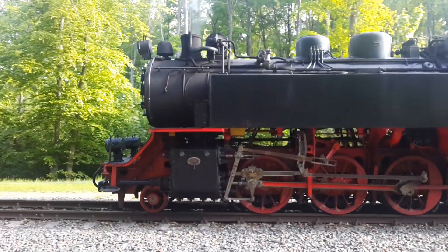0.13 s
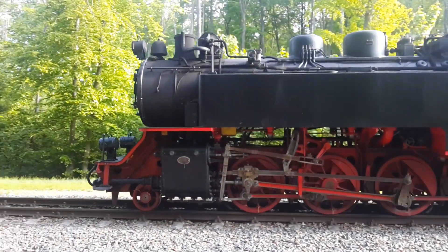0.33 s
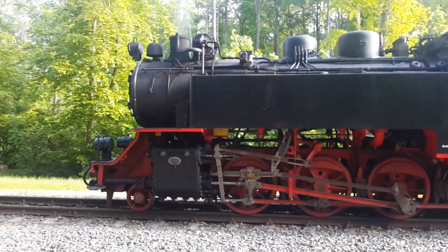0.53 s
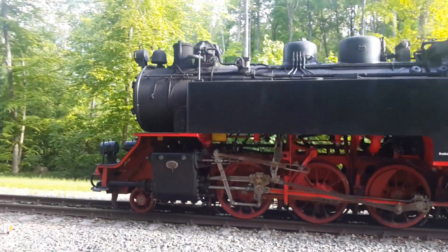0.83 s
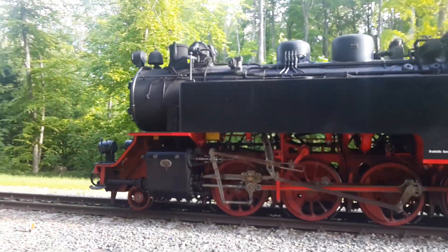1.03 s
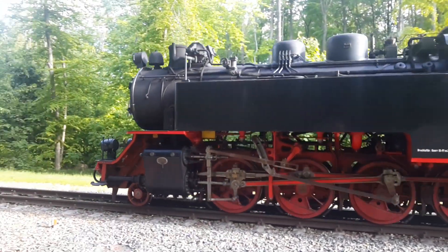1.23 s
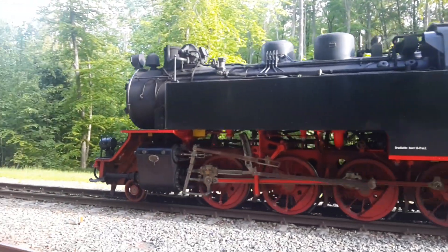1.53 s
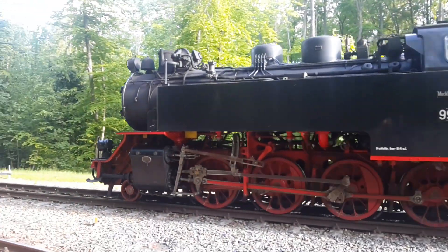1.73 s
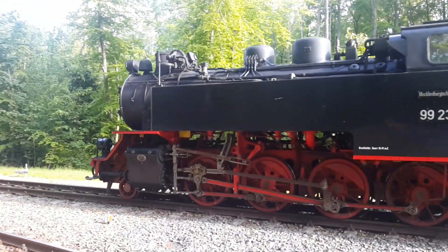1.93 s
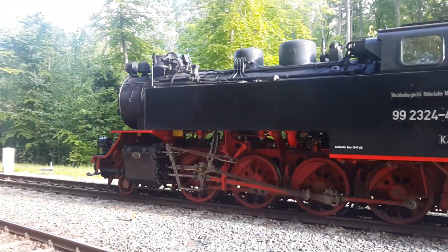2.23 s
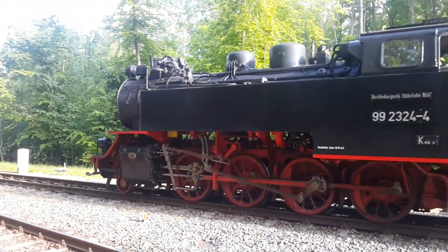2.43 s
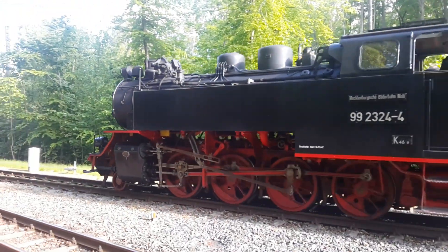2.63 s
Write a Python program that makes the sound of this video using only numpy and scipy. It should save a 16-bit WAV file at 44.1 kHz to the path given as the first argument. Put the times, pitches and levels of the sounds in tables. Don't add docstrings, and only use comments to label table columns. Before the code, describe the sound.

Steady throaty exhaust beats from a passing steam engine, each a lumpy low hoot with roar and hiss, a few rod knocks between, and a brief valve puff last; outdoors, close, uneven stereo microphone.

```python
import sys
import numpy as np
from scipy import signal
from scipy.io import wavfile

SR = 44100
rng = np.random.default_rng(int(sys.argv[2]) if len(sys.argv) > 2 else 0)


def invert_db(level):
    return 10 ** (np.asarray(level, dtype=float) / 20)


def to_wav(s):
    ch = np.atleast_2d(s).T
    pcm = np.round(np.clip(ch, -1, 1) * 32767)
    wavfile.write(sys.argv[1], SR, pcm.astype(np.int16))


N = 123479
TIME_S = np.arange(N) / SR
MIRROR = np.array([[1], [-1]])


def rms_one(x):
    return x / np.sqrt(np.mean(x ** 2) + 1e-20)


def at_hz(points, hz):
    table_hz, value = np.array(points).T
    return np.interp(np.log(hz), np.log(table_hz), value)


def drift(rate):
    r = np.exp(-80 * np.pi * rate / SR)
    slow = signal.lfilter([1], [1, -2 * r, r * r], rng.standard_normal(N // 40 + 2002))
    slow = slow[2000:]
    return np.interp(np.arange(N) / 40, np.arange(len(slow)), rms_one(slow))


def spin(pitch_hz):
    return np.exp(2j * np.pi * np.cumsum(pitch_hz) / SR)


def resonance(x, hz, width_hz):
    r = np.exp(-np.pi * width_hz / SR)
    top = np.array([1, 0, -1]) * (1 - r * r) / 2
    return signal.lfilter(top, [1, -2 * r * np.cos(2 * np.pi * hz / SR), r * r], x)


# frequency in Hz, likeness from 0 to 1.
PORT_LIKENESS = [(60, 0.82), (250, 1), (600, 0.98), (1200, 0.96), (2400, 0.14), (4500, .3), (9000, 0)]


def pair(hz, white):
    alike = np.clip(at_hz(PORT_LIKENESS, hz), 0, 1)
    middle, side = np.sqrt(1 + alike) * white[0], np.sqrt(1 - alike) * white[1]
    return (middle + side * MIRROR) / np.sqrt(2)


def banded(spectrum, patchy_db):
    edges = 28 * 2 ** np.arange(0, 9.6, .5)
    centres = np.sqrt(edges[1:] * edges[:-1])
    white = rng.standard_normal((2, 2, N))
    together = drift(1.3)
    bands = []
    for k, hz in enumerate(centres):
        band_pass = signal.butter(2, [edges[k], edges[k + 1]], "band", fs=SR, output="sos")
        band = signal.sosfilt(band_pass, white[k % 2])
        flicker_db = patchy_db * (0.58 * together + drift(18))
        bands.append(invert_db(at_hz(spectrum, hz) + flicker_db) * pair(hz, band))
    return centres, np.array(bands) / np.sqrt(np.mean(sum(bands) ** 2))


def swell(start, attack, hold, release):
    t = TIME_S - start
    rise = np.sin(np.pi / 2 * np.clip(t / attack, 0, 1)) ** 2
    return rise * np.exp(-np.maximum(t - attack - hold, 0) / release)


# start in seconds, length in seconds, echo level in dB, roar level in dB,
# brightness in dB per octave.
EXHAUST_BEATS = [
    (0.175, 0.074, -12, -25, -0.86),
    (0.593, 0.075, -20.5, -24, .3),
    (0.988, 0.087, -22, -23.5, -0.85),
    (1.358, 0.081, -24, -27, 0.2),
    (1.737, 0.068, -20, -25, -0.1),
    (2.109, 0.098, -22, -28, -1.4),
    (2.469, 0.096, -20, -27, -1.5),
]


def beats(levels_db, wood_db):
    attack_s, hold_share, release_s, wood_t60_s = .042, 0.29, .022, 0.84
    total = 0
    for (start, length, *_), db in zip(EXHAUST_BEATS, levels_db):
        direct = swell(start - attack_s / 2, attack_s, hold_share * length, release_s)
        echo = invert_db(wood_db) * swell(start, length, 0, wood_t60_s / np.log(1000))
        total = total + invert_db(db) * (direct + echo)
    return total


# start in seconds, peak level in dB, length in seconds.
STEAM_LUMPS = [(0.183, -34, 0.013), (0.21, -6, 0.044), (0.236, -23, 0.03), (0.592, -27, 0.022),
               (0.612, -3, 0.027), (0.67, -12.5, 0.016), (0.973, -16.5, 0.063), (0.989, -8.5, 0.04),
               (1.027, -10, 0.014), (1.044, -10, 0.03), (1.096, -18, 0.01), (1.373, -24, 0.013),
               (1.381, -4.5, 0.02), (1.428, -20.5, 0.03), (1.746, -11, 0.039), (1.77, -7.5, 0.014),
               (1.81, -14.5, 0.011), (1.83, -31, 0.03), (2.102, -13.5, 0.011), (2.127, -5, 0.034),
               (2.162, -18.5, 0.044), (2.187, -15.5, 0.016), (2.469, -10.5, 0.023), (2.495, -12.5, 0.017),
               (2.507, -12, 0.033), (2.532, -21, 0.021)]
# time in seconds, pitch in Hz.
CHIMNEY_PITCH = [
    (.23, 256.1),
    (.64, 258.6),
    (1.041, 256),
    (1.411, 231.4),
    (1.79, 245),
    (2.152, 266),
    (2.52, 263.5),
]


def chimney_note():
    wander_hz, wander_rate, flutter_db, note_db = 20, 13.89, 3, -6.5
    side_width_hz, side_share, ring_width_hz, ring_even = 37, .05, 11.7, .8
    rise_s, fall_s, wood_db = 0.011, .012, -10
    pitch = np.interp(TIME_S, *np.transpose(CHIMNEY_PITCH))
    note = spin(pitch + wander_hz * drift(wander_rate)).imag * invert_db(flutter_db * drift(17.5))
    side = drift(side_width_hz) + 1j * drift(side_width_hz)
    side = rms_one((side * spin(pitch)).real)
    ring = drift(ring_width_hz) + 1j * drift(ring_width_hz)
    ring = ring / (np.abs(ring) + 0.043) ** ring_even
    ring = rms_one((ring * spin(pitch)).real)
    power = 0
    for start, db, length in STEAM_LUMPS:
        power = power + (invert_db(db) * swell(start, rise_s, max(length - rise_s, 0), fall_s)) ** 2
    driven = (rms_one(note) + side_share * side * MIRROR) * invert_db(note_db) * np.sqrt(power)
    echo_db = [beat[2] + wood_db / 2 for beat in EXHAUST_BEATS]
    return driven + ring * beats(echo_db, wood_db)


ROAR_WOOD_DB = -15
# frequency in Hz, width in Hz, level in dB.
PIPE_RESONANCES = [(169.7, 87, 2), (307, 88, -4), (533, 67, -4.9), (652, 60, -5), (932, 145, -5.5),
                   (1110, 105, -14), (1550, 160, -11.5), (2073, 117, -13)]


def pipe_roar(roar_db, tilt_db):
    pipe_db, scatter_db = 1, 1.2
    out = 0
    for hz, width_hz, db in PIPE_RESONANCES:
        noise = rng.standard_normal((2, N))
        for _ in range(2):
            noise = resonance(noise, hz, 1.78 * width_hz)
        scatter = scatter_db * rng.standard_normal(len(EXHAUST_BEATS))
        level_db = roar_db + pipe_db + db + tilt_db * np.log2(hz / 700) + scatter
        out = out + rms_one(pair(hz, noise)) * beats(level_db, ROAR_WOOD_DB)
    return out


# start in seconds, rise in seconds, hold in seconds, level in dB.
STEAM_JETS = [
    (0.143, 0.034, 0.038, -32.5),
    (0.571, 0.044, 0.025, -30),
    (0.952, 0.055, 0.028, -30),
    (1.335, 0.055, 0.019, -33),
    (1.704, 0.032, 0.047, -32),
    (2.093, 0.029, 0.036, -32),
    (2.448, 0.045, 0.011, -30),
]


def jet_swells():
    fast_share, fast_s, slow_s = 0.18, 0.075, 0.084
    total = 0
    for start, rise, hold, db in STEAM_JETS:
        fast = fast_share * swell(start, rise, 0, fast_s)
        total = total + invert_db(db) * (fast + swell(start, rise, hold, slow_s))
    return total


# frequency in Hz, level in dB per Hz.
BLAST_COLOUR = [(35, -30), (100, -18.5), (200, -14.5), (600, -33.5), (1500, -8.5), (3000, -19.5),
                (7000, -21), (13000, -35.5)]


def exhaust():
    blast_db, split_hz, ragged_db, ragged_rate = -8, 2500, 1, 16.4
    roar_db, tilt_db = np.array(EXHAUST_BEATS)[:, 3:].T
    ragged = invert_db(ragged_db * drift(ragged_rate))
    centres, bands = banded(BLAST_COLOUR, patchy_db=1.03)
    low_roar = bands[centres < split_hz].sum(axis=0) * beats(roar_db + blast_db, ROAR_WOOD_DB)
    hiss = rms_one(bands[centres > split_hz].sum(axis=0)) * jet_swells()
    return (pipe_roar(roar_db, tilt_db) + low_roar) * ragged + hiss * ragged ** 0.67


# frequency in Hz, level in dB per Hz.
VALVE_COLOUR = [(400, -5.5), (1200, -2), (3000, -6), (7000, -6.5), (11000, -24)]


def valve():
    start_s, hold_s, puff_db, ring_hz, ring_db = 2.726, 0.014, -31.5, 2270, -36
    puff = banded(VALVE_COLOUR, patchy_db=1.5)[1].sum(axis=0) * swell(start_s, 0.0087, hold_s, 0.027)
    ring = rms_one(resonance(rng.standard_normal(N), ring_hz, 58.5)) * swell(start_s, 0.0054, .012, 0.0049)
    return invert_db(puff_db) * puff + invert_db(ring_db) * ring


# time in seconds, peak level in dB, brightness in dB per octave.
ROD_KNOCKS = [
    (.392, -22.5, 4),
    (.721, -28, 10),
    (1.949, -16, -1.5),
    (2.299, -29.5, -9),
]
# delay in seconds, loss in dB.
KNOCK_BOUNCES = [
    (0, 0),
    (.0035, 3),
    (.012, 9),
    (.027, 13),
]
# frequency in Hz, level in dB, decay by 60 dB in seconds.
ROD_MODES = [(300, -12, .06), (545, -3, .09), (625, -3, .06), (900, -4, .055), (1270, -6, .05),
             (1600, -12, .025), (1900, -14, .02)]


def rods():
    out = np.zeros(N)
    for start, db, tilt_db in ROD_KNOCKS:
        luck_db = 2.0 * rng.standard_normal(len(ROD_MODES))
        for lag, loss_db in KNOCK_BOUNCES:
            age = np.maximum(TIME_S - start - lag, 0)
            for (hz, mode_db, t60), chance_db in zip(ROD_MODES, luck_db):
                level_db = db - 2.9 - loss_db + mode_db + tilt_db * np.log2(hz / 700) + chance_db
                out += invert_db(level_db - 60 * age / t60) * np.sin(2 * np.pi * hz * age)
    return out


# frequency in Hz, width in Hz, level in dB, right-port gain in dB.
STEAM_LEAKS = [(4760, 75, -46, 5), (6630, 39, -51, -40), (7030, 460, -46.5, -23), (6350, 15, -52.5, -43),
               (4110, 250, -61, 12)]
# time in seconds, pitch in Hz.
WHISTLE_COURSE = [(0.0, 4830), (0.27, 4839), (0.29, 4620), (0.68, 4885), (0.79, 4706), (1.0, 4920),
                  (1.04, 4660), (1.48, 4880), (1.52, 4690), (1.64, 4820), (2.1, 4735), (2.61, 4800),
                  (2.75, 4760), (2.8, 4500)]


def leaks():
    waver, flutter_db = .004, 1.3
    out = 0
    for k, (hz, width_hz, db, right_db) in enumerate(STEAM_LEAKS):
        pitch = np.interp(TIME_S, *np.transpose(WHISTLE_COURSE)) if k == 0 else hz
        carrier = spin(pitch * (1 + waver * drift(6.1)))
        noise = [((drift(width_hz) + 1j * drift(width_hz)) * carrier).real for _ in range(2)]
        port_gain = invert_db(np.array([[0], [right_db]]))
        out = out + invert_db(db + flutter_db * drift(21)) * pair(hz, noise) * port_gain
    return out


# frequency in Hz, level in dB per Hz.
GROUND_COLOUR = [(30, -44), (70, -1), (250, -4.5), (900, -9.5), (2300, -12), (3300, -14), (6800, -14.5),
                 (14000, -17.5)]


def ground():
    return invert_db(-35) * banded(GROUND_COLOUR, patchy_db=2.0)[1].sum(axis=0)


def scene():
    return chimney_note() + exhaust() + valve() + rods() + leaks() + ground()


def left_port(x):
    ring = resonance(x, 7180, 2440)
    dip = .6 * resonance(x, 3200, 900)
    return signal.lfilter(*signal.butter(2, 14800, fs=SR), x + ring - dip)


def right_port(x):
    muffle_hz, muffle_top_hz, gain_db, self_noise_db = 648, 5350, 3.5, -74.5
    r, q = np.exp(-2 * np.pi * np.array([muffle_hz, muffle_top_hz]) / SR)
    muffled = signal.lfilter([0, 0, (1 - r) * (1 - q)], [1, -r - q, r * q], x)
    return invert_db(gain_db) * muffled + invert_db(self_noise_db) * rng.standard_normal(N)


def band_limit(x):
    return signal.sosfilt(signal.butter(12, 15270, fs=SR, output="sos"), x)


def record(dry):
    dry = signal.sosfilt(signal.butter(2, 37, "high", fs=SR, output="sos"), dry)
    both = np.array([left_port(dry[0]), right_port(dry[1])])
    ceiling = 0.74
    rounded = ceiling * np.tanh(both / ceiling)
    mix = signal.sosfilt(signal.ellip(12, .1, 70, 14500, fs=SR, output="sos"), rounded)
    return band_limit(mix)


dry = scene()
out = record(dry)
to_wav(out)
```